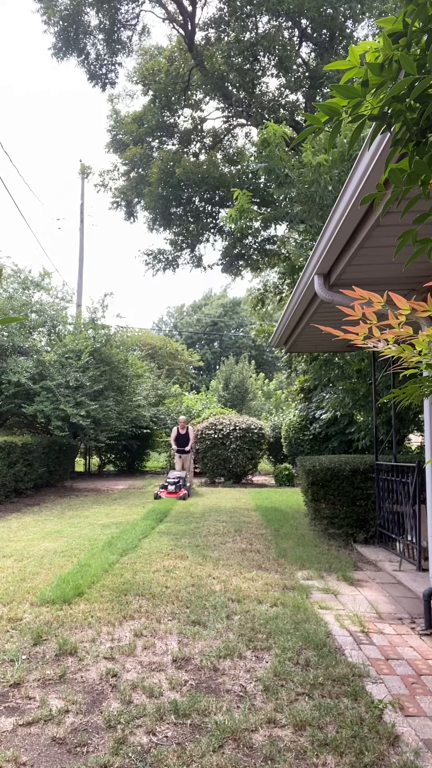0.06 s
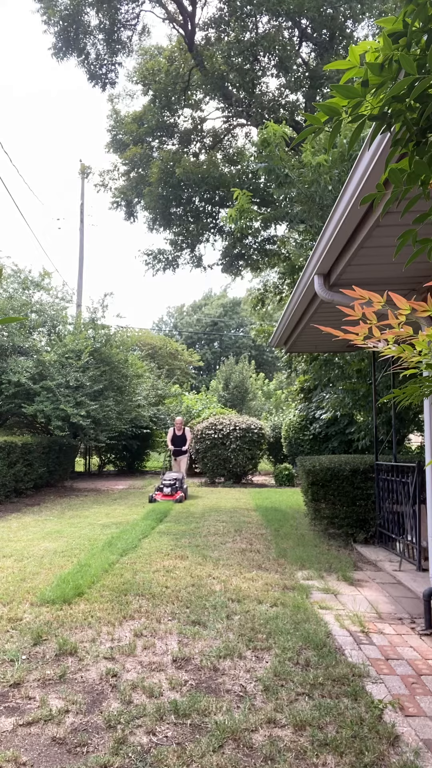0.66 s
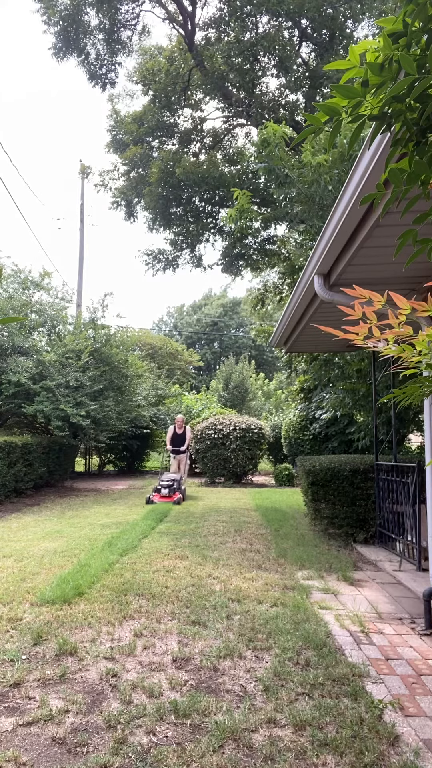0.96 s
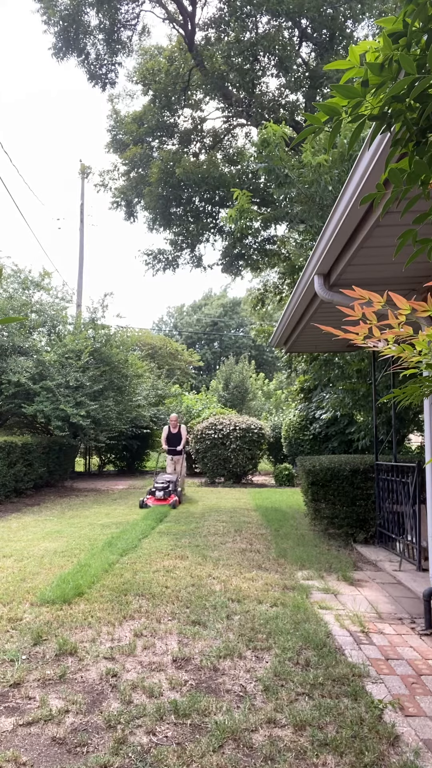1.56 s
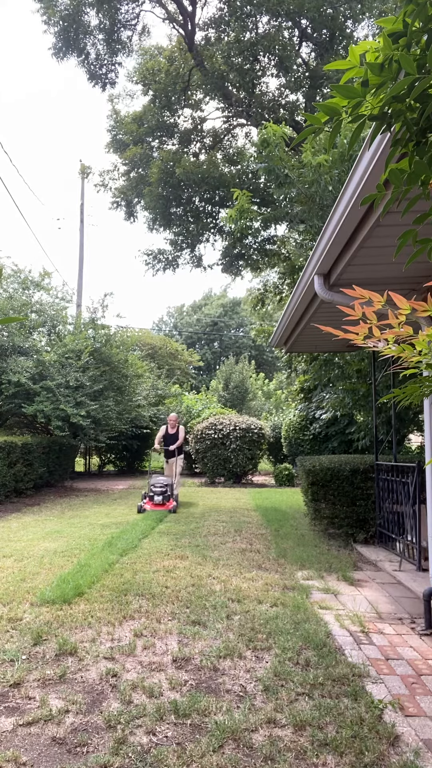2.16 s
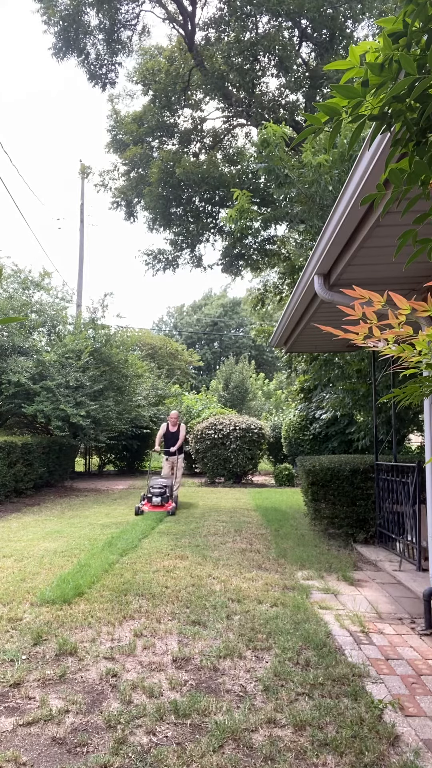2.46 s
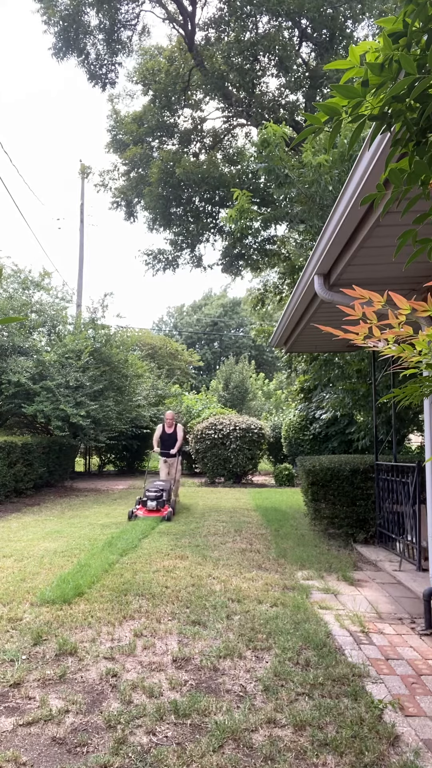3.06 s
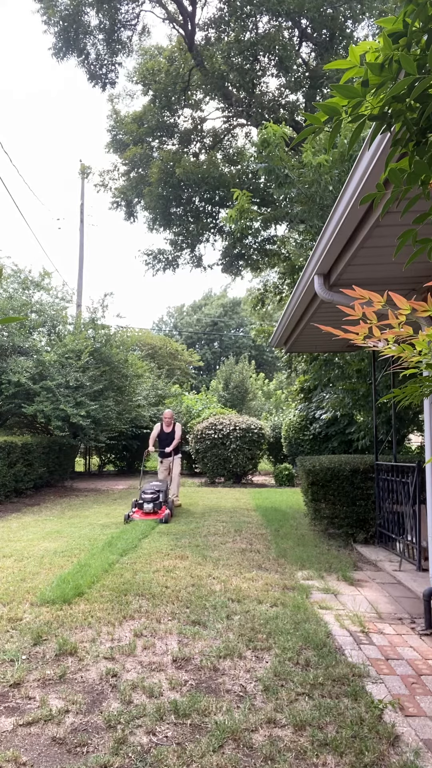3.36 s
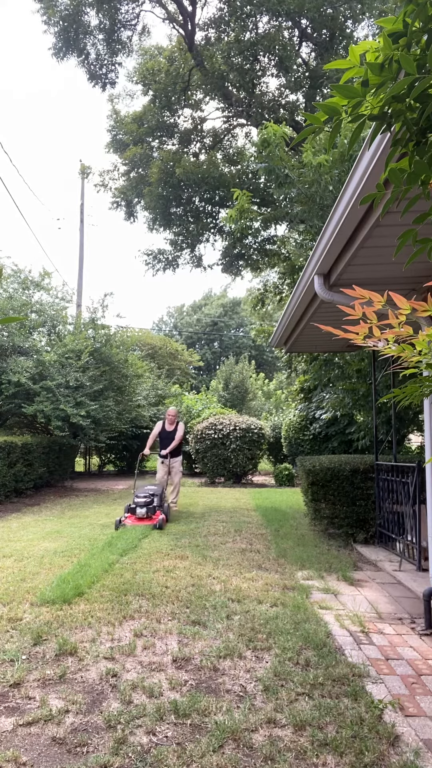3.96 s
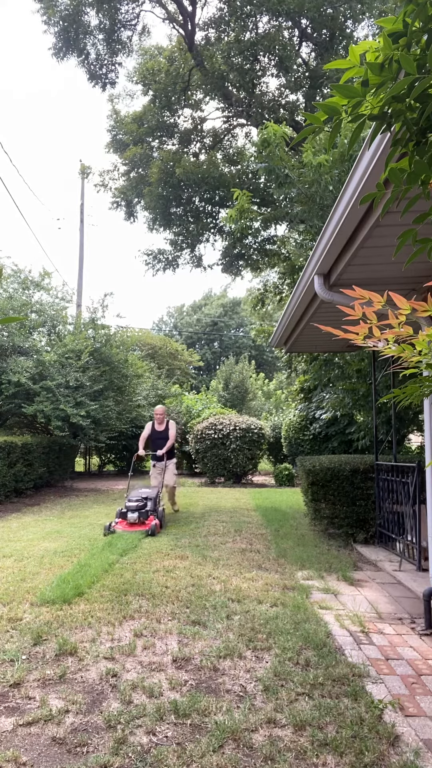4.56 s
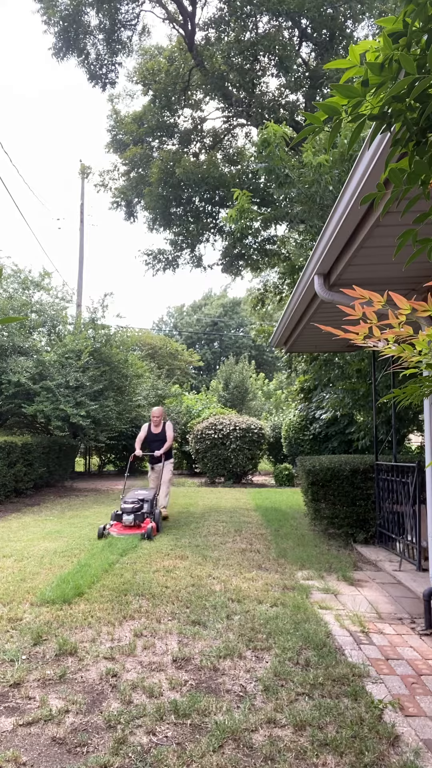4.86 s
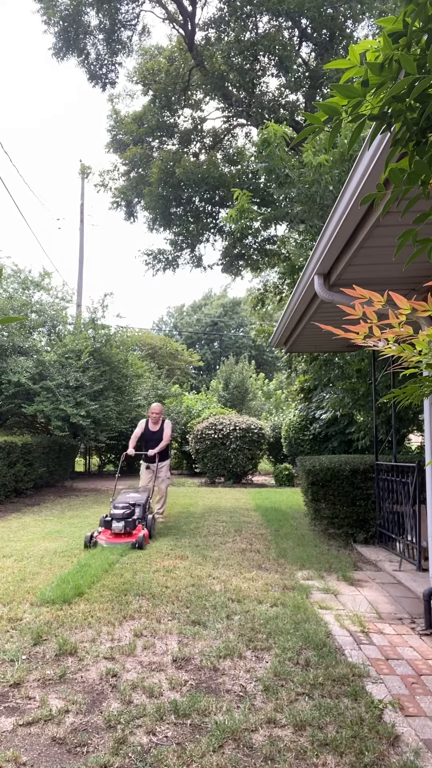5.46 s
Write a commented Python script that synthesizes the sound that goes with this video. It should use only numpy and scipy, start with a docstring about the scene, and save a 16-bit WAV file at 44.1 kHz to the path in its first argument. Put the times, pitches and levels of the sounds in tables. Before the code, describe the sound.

Outdoors on a lawn, a phone picks up the continuous drone of a small petrol mower some way off. As it comes slowly closer, the blade hum and low rumble swell, and the metallic rattle and grainy hiss of cutting become clearer. The engine slows a little now and then in thicker grass. Towards the end the steel housing rings briefly and a twig cracks sharply under the blade.

```python
"""The steady drone of a petrol mower grows as it is pushed slowly across a garden towards a phone.
Its one-cylinder, four-stroke engine fires once per cycle (two turns) and slows in thick grass.
The two-ended blade hums, the valves clatter through the ringing steel deck (the blade's housing)
and cut grass hisses. Near the end the blade cracks a twig."""
import sys
import numpy as np
from scipy import signal
from scipy.fft import rfft, irfft
from scipy.io import wavfile
from scipy.ndimage import map_coordinates

SR = 44100
rng = np.random.default_rng(int(sys.argv[2]) if len(sys.argv) > 2 else 0)


def transcribe(signal):
    """Save signal, clipped to [-1, 1], as a 16-bit WAV file at the path in sys.argv[1]."""
    frames = np.atleast_2d(signal).T
    limited = np.clip(frames, -1, 1)
    pcm = np.round(limited * 32767).astype(np.int16)
    wavfile.write(sys.argv[1], SR, pcm)


N = 247842
TIME = np.arange(N) / SR
FREQ_HZ = np.maximum(np.fft.rfftfreq(N, 1 / SR), 1)

# engine speed, which sags where the grass is thick: time_s, turns_per_minute
ENGINE_SPEED = [(0.0, 3006), (0.8, 3026), (1.07, 2953), (1.33, 2968), (1.52, 3003), (2.08, 3036),
                (2.3, 2920), (2.75, 2979), (3.0, 2943), (3.55, 2952), (3.85, 2977), (4.15, 2971),
                (4.52, 2880), (4.75, 2965), (5.08, 2979), (5.25, 2833), (5.62, 2858)]


def engine_drone(cycle, near, muffler_hz=380, intake_hz=240, intake_lead=.23, unsteady=0.019, warble=0.03):
    """Each cycle the engine gulps air, then puffs exhaust; the tone warbles as the blade bites."""
    # tones of the drone: multiple_of_firing_rate, far_db, near_db
    harmonics = [(2, -17, -11), (3, -16, -12), (5, -6, -6), (6, -0.5, -4), (7, -12, -15.5), (9, -25, -10),
                 (10, -27.5, -4), (11, -25.5, -21), (13, -20, -11), (14, -24.5, -20.5), (15, -24.5, -18.5),
                 (17, -20, -22), (18, -28, -29), (19, -21, -20), (20, -22.5, -14), (21, -26, -20),
                 (22, -23, -18), (23, -30, -22), (24, -25, -16), (25, -47, -51), (26, -37.5, -34),
                 (27, -36, -20), (28, -25.5, -19.5), (32, -27.5, -25)]
    # exhaust level, highest where the outlet points at the phone: time_s, level_db
    exhaust_level = [(0, -22), (1.3, -19.5), (3.9, -18), (4.5, -19), (5.62, -20)]
    firing_hz = (cycle[-1] - cycle[0]) * SR / N
    out = 0
    for multiple, far_db, near_db in harmonics:
        k = round(multiple)
        # the gulp is sharper than the puff, so it takes over above intake_hz
        puff_and_gulp = 1 + k * firing_hz / intake_hz * np.exp(2j * np.pi * k * intake_lead)
        # the muffler scatters the timing of the high tones
        scatter = np.pi * min((k * firing_hz / muffler_hz) ** 4, 1) * rng.uniform(-1.075, 1)
        bite = warble * k * near * load() * drift(14.5)
        angle = 2 * np.pi * k * cycle + np.angle(puff_and_gulp) + scatter + bite
        tremble = unsteady * k * (drift(5.8) * np.cos(angle) + drift(15.6) * np.sin(angle))
        out = out - gain(far_db + near * (near_db - far_db)) * (np.cos(angle) + tremble)
    return np.sqrt(2) * gain(curves(exhaust_level)[0]) * out


def blade_hum(cycle, near, lead_rad=0.4, flutter=0.05, warble=0.11, upper_lift_db=0.24):
    """Blade ends pass the grass chute four times a cycle; rough air shakes the hum, more in thick grass."""
    # the deepest tone, lifted and cancelled by the echo off the lawn: time_s, level_db
    deepest = [(0, -26.5), (.8, -24), (1.25, -21.5), (1.7, -20.5), (2.0, -24), (2.8, -21.5), (3.9, -19.3),
               (4.55, -17), (5.62, -17.5)]
    # tones at 2, 3 and 4 times that pitch, each swelling and fading on its own: time_s, level_db
    second = [(0.03, -22), (0.83, -25), (1.02, -21.5), (1.14, -32), (1.31, -20.5), (1.44, -25),
              (2.07, -22.5), (2.19, -30.5), (2.36, -23.5), (3.48, -31), (3.55, -24), (4.08, -26),
              (4.19, -30), (4.27, -21), (4.48, -26.5), (5.58, -25)]
    third = [(0.1, -55), (1.53, -42), (1.84, -28.5), (1.95, -33), (2.15, -24.5), (2.24, -32), (3.43, -23),
             (4.46, -22), (5.03, -19.5), (5.11, -28), (5.32, -19.5), (5.38, -27), (5.49, -16.5),
             (5.58, -21)]
    fourth = [(0, -37.5), (.5, -29), (.7, -35), (1.139, -30.5), (1.33, -33), (1.72, -34.5), (1.92, -24),
              (2.04, -28), (2.13, -25.5), (2.3, -37), (2.5, -37), (2.85, -29.5), (3.6, -34), (3.8, -46),
              (4.15, -32), (4.6, -32), (5.0, -29.5), (5.62, -29)]
    sizes = [gain(curves(deepest)[0])]
    sizes += [gain(curves(table)[0] + upper_lift_db) for table in (second, third, fourth)]
    shake = flutter * (1 + near) + warble * near * load()
    out = 0
    for k, size in enumerate(sizes, 1):
        angle = 2 * np.pi * 4 * k * cycle
        out = out - size * np.cos(angle - lead_rad * k + shake * k * drift(23))
    return np.sqrt(2) * out


def deck_noise(cycle, near):
    """All the noise from the steel deck along one path; its rings colour the rumble and clatter."""
    # notes at which the deck and engine cover ring: pitch_hz, width_hz, relative_db
    rings = [(569, 30, -5), (887, 21.5, -6.5), (1000, 23, -6.5), (1520, 20.4, -6.5), (1745, 24, -6),
             (1940, 36, 0.5), (2126, 61, 0), (2536, 90, 2.5), (2930, 48, -0.5), (3086, 43, 0.5),
             (3766, 240, -3)]
    ring_power = sum(np.abs(1.73 * gain(db) * resonance(hz, width)) ** 2 for hz, width, db in rings)
    body = np.sqrt(1 + ring_power)
    rumble = air_rumble(cycle, near, body)
    clatter = valve_clatter(cycle, near, body)
    return rumble + clatter + grass_hiss(cycle, near) + valve_ticks(cycle)


def air_rumble(cycle, near, body):
    """Air churned under the deck rumbles and surges once a cycle."""
    # tone colour of the rumble: pitch_hz, far_db, near_db
    colour = [(25.4, -14, -21), (59.6, -4, -17), (104, -2, -14), (189.6, -6, -15), (277, -8, -10),
              (392, -4, -2), (544, -7, -3.5), (785, -15.5, -7), (985, -13, -12), (1210, -36, -14.5),
              (2000, -56, -43)]
    churn = cyclic_noise(cycle, repeat=0.07) * (0.45 + 0.61 * burst(cycle, -0.29, 0.21, scatter_db=1.5))
    level = loudness(near, far_db=-31.5, near_db=-28, load_db=0.64)
    return level * far_to_near(churn, colour, near, body)


def valve_clatter(cycle, near, body, repeat=0.45, slop_cycles=0.0055):
    """The valves rattle steadily; intake, burning and exhaust add bursts, each a bit early or late."""
    # noisy bursts, timed from the exhaust puff: place_cycles, width_cycles, strength, pitch_hz, width_hz
    strokes = [(-.29, 0.07, 0.66, 3700, 3600), (-.075, .02, 1.08, 1660, 800),
               (-.01, 0.018, 0.87, 1960, 2200), (.065, 0.019, 0.65, 1690, 1300),
               (.14, 0.099, 0.63, 1400, 995), (-.08, .07, .55, 3500, 3200)]
    # tone colour of the valves and exhaust gas: pitch_hz, far_db, near_db
    colour = [(500, -18, -12), (895, -2, -3), (1050, -1, -3), (1480, -3, -2), (2270, -4, -6),
              (2844, -3.5, -1), (3300, -4, -4), (4560, -3, -4), (4370, 2.5, 13), (5140, -6, -20.5),
              (5940, -9.5, 7), (7670, -11.5, -7.5), (10800, -22, -15)]
    rattle = filtered(cyclic_noise(cycle, repeat), resonance(2170, 4400))
    for place, width, strength, hz, width_hz in strokes:
        gas = filtered(cyclic_noise(cycle, repeat), resonance(hz, width_hz) ** 2)
        stroke = burst(cycle, place + slop_cycles * drift(20), width, scatter_db=1.86)
        rattle = rattle + strength * stroke * gas
    level = loudness(near, far_db=-31.5, near_db=-26, load_db=-0.97)
    return level * moving_air(far_to_near(echoes(rattle), colour, near, body))


def grass_hiss(cycle, near):
    """Stalks are cut in clumps, so the hiss is grainy; it swells in thick patches."""
    # tone colour of cut grass and air at the blade tips: pitch_hz, relative_db
    colour = [(2000, -5), (5000, 0), (7000, -1), (9000, -1), (10300, 0), (12000, -2), (14300, -4.5),
              (15500, -7)]
    # patches of thick grass: middle_s, half_length_s, boost_db
    patches = [(2.1, 0.35, 1), (5.25, 0.18, 1.6)]
    cutting = noise() * (1 + 0.39 * burst(cycle, -0.096, 0.31, scatter_db=3.5))
    clumps = gain(0.8 * drift(600) + 0.5 * drift(7.4))
    thick = gain(sum(db * swell(middle_s, span_s) for middle_s, span_s, db in patches))
    level = loudness(near, far_db=-41, near_db=-34.5, load_db=0.65)
    return thick * level * filtered(cutting * clumps, gain(spectra(colour)[0]))


def valve_ticks(cycle, decay_cycles=.12, scatter_db=2.5):
    """Valves and their levers snap shut once a cycle and briefly ring the engine cover."""
    # ticks, each clearest on one stretch of the walk:
    # place_cycles, pitch_hz, width_hz, level_db, middle_s, half_length_s
    ticks = [(-.36, 3790, 200, -44, 2.05, 2.3), (-.35, 2490, 120, -42, 0.67, 0.96),
             (-.14, 3760, 300, -49, 1.5, 1.8), (-.25, 3690, 430, -37, 5.08, 0.26),
             (0.066, 2870, 460, -35, 5.35, 0.28)]
    out = 0
    for place, hz, width_hz, db, middle_s, span_s in ticks:
        snap = np.exp(-((cycle - place) % 1) / decay_cycles) * gain(scatter_db * drift(19))
        ring = filtered(noise(), resonance(hz, width_hz) ** 2)
        out = out + gain(db) * swell(middle_s, span_s) * unit_rms(snap * ring)
    return out


def ringing_metal(cycle, jolt=0.61):
    """Every firing jolts the thin metal of the cover and deck, which rings and whines."""
    # a thin whine above the blade's hum: time_s, level_db
    whine = [(0, -45), (.35, -58), (.5, -46), (.8, -50), (1.05, -43), (1.3, -47.5), (1.52, -43), (1.7, -44),
             (1.92, -36.5), (2.1, -41), (2.3, -39), (2.55, -47), (3.3, -44.5), (3.6, -57), (4.15, -46),
             (4.6, -53), (5.62, -49)]
    # two close rings of the deck, swelling as the blade works: time_s, lower_db, upper_db
    ring_pair = [(0, -55, -46), (1.4, -46, -43.5), (2.2, -41, -40), (2.45, -44, -39.5), (2.8, -40, -38),
                 (3.15, -38, -41), (3.5, -55, -48), (3.9, -45, -39), (4.25, -38, -34.5), (4.55, -39, -45),
                 (4.85, -47, -50), (5.62, -48, -48)]
    # thin panels, each with its own stretch of the walk: pitch_hz, width_hz, wander_hz, base_db,
    # rise_db, middle_s, half_length_s, chatter_db, left_minus_right_db, left_lead_rad
    panels = [(572, 22, 2.93, -49.5, 23, 5.33, 0.15, 5, 4, .4),
              (1448, 90, 9.5, -55, 14, 1.5, 0.67, 5, 13, 2.8),
              (1800, 64, 20, -54, 13, 4.8, 0.98, 4, 10, .5),
              (1929, 38, 9.26, -54, 11.5, 1.53, 0.36, -1, 2, 0.33),
              (2420, 94, 44, -59.5, 30, 5.3, 0.23, 4, 1.5, 2.46),
              (3764, 30, 16, -47, -0.5, 1.8, 1, 3.5, 2, 1.1)]
    shaking = 3.5 + jolt * burst(cycle, -0.12, .17, scatter_db=3)
    whine_db = curves(whine)[0]
    lower_db, upper_db = curves(ring_pair)
    out = gain(whine_db) * panel(shaking, 1277.5, 14, wander_hz=4.76, chatter_db=1.5, lead_rad=0.95)
    out += gain(lower_db) * panel(shaking, 2278, 130, wander_hz=28, chatter_db=1.5, lead_rad=1.0)
    out += gain(upper_db) * panel(shaking, 2458, 80, wander_hz=26, chatter_db=2, lead_rad=1.42, pan_db=-2)
    for hz, width_hz, wander_hz, base_db, rise_db, middle_s, span_s, chatter_db, pan_db, lead in panels:
        level = gain(base_db + rise_db * swell(middle_s, span_s))
        out += level * panel(shaking, hz, width_hz, wander_hz, chatter_db, lead, pan_db)
    return out


def panel(shaking, hz, width_hz, wander_hz, chatter_db, lead_rad, pan_db=0):
    """One thin panel, in stereo; it chatters on its fixings and wanders in pitch."""
    ring = signal.hilbert(filtered(noise(), resonance(hz, width_hz) ** 2))
    ring = ring / (np.abs(ring) + .5) ** 0.54  # partly evens out the loudness
    ring = ring * shaking * gain(chatter_db * drift(55))
    ring = ring * np.exp(2j * np.pi * np.cumsum(wander_hz * drift(8)) / SR)
    left = gain(pan_db / 2) * ring.real
    right = gain(-pan_db / 2) * (ring * np.exp(-1j * lead_rad)).real
    return unit_rms(np.array([left, right]))


def deck_buzz(cycle, flutter=0.01, fade_db=2.5, apart_rad=0.7):
    """The deck sends out a fine rasp of high engine tones, which waver and fade in the moving air."""
    # tones, each clearest on one stretch of the walk:
    # multiple_of_firing_rate (rounded below), level_db, middle_s, half_length_s
    overtones = [(23, -41, 3.6, 0.89), (25, -48, 2.9, 1.1), (28, -43.5, 2, .6), (29, -48.5, 3.1, 1),
                 (30, -49, 4.8, 0.91), (32, -47, 1.8, 0.53), (32, -46, 4.4, .8), (35, -50, 3.9, 0.8),
                 (36, -43.5, 3.97, .5), (40, -47.5, 1.8, 0.87), (52, -49.5, 3.6, 0.95),
                 (56, -60.5, 0.79, 0.69), (57, -58, 1.43, 0.66), (58, -47, 1.38, 0.38),
                 (58, -46, 4.18, 0.39), (60, -49, 5.2, 1.8), (69.8, -48, 0.55, 1.4), (70.5, -53.5, 6, 0.5),
                 (71.9, -49, 4.2, 1.3), (77.1, -44.5, 4, .8), (78.4, -48, 1.6, 0.63),
                 (78.8, -46.5, 4.5, 0.52), (89.5, -55, 2.8, 0.96), (93.2, -53, 3.2, 1.3),
                 (98.4, -48.5, 3.3, 0.7), (120.2, -52.5, 2.6, 1.5)]
    out = 0
    for multiple, db, middle_s, span_s in overtones:
        k = round(multiple)
        angle = 2 * np.pi * (k * cycle + rng.random()) + flutter * k * drift(10)
        size = gain(db + fade_db * drift(6)) * swell(middle_s, span_s)
        side_shift = np.array([[1], [-1]]) * apart_rad * drift(1.1)
        out = out + size * np.cos(angle + side_shift)
    return np.sqrt(2) * out


def twig_snap(apart=0.87):
    """A twig snaps and its pieces hit the deck: quick, bright cracks, partly unlike left and right."""
    # cracks of the twig: start_s, level_db, decay_s
    cracks = [(5.49, -19, 0.0028), (5.494, -19, 0.0076), (5.509, -27, 0.005)]
    level = sum(gain(db) * (TIME >= s) * np.exp(-np.abs(TIME - s) / decay_s) for s, db, decay_s in cracks)
    colour = np.abs(resonance(4600, 7500)) + 1.8 * np.abs(resonance(2950, 1100)) + .06
    middle, side = filtered(noise(), colour), filtered(noise(), colour)
    return level * unit_rms(middle + np.array([[apart], [-apart]]) * side)


def echoes(sound):
    """Two echoes thin out some pitches; these slide down as the mower nears and the delays grow."""
    # echoes off the lawn (soft ground flips the wave) and porch: delay_ms, growth_ms_per_s, strength
    paths = [(1.495, 0.173, -0.14), (0.753, 0.225, 0.11)]
    out = sound
    for delay_ms, growth, strength in paths:
        late_samples = (delay_ms + growth * TIME) * SR / 1000
        out = out + strength * map_coordinates(sound, [np.arange(N) - late_samples], order=3)
    return out


def moving_air(sound, bend_s=.00008, depth_db=2, fade_rate_hz=21, bands=10):
    """Moving air bends the pitch a little and makes each third of an octave come and go on its own."""
    bent = map_coordinates(sound, [np.arange(N) + bend_s * SR * drift(9)], order=3, mode="mirror")
    spectrum = rfft(bent)
    band = np.clip(3 * np.log2(FREQ_HZ / 800), 0, bands - 1)
    out = 0
    for k in range(bands):
        share = np.maximum(1 - np.abs(band - k), 0)
        out = out + irfft(spectrum * share, N) * gain(depth_db * drift(fade_rate_hz))
    return out


def microphones(direct, scattered, mono_hz=440, bass_unlike_db=-30):
    """Both sides share the bass; higher up one leads, and echoes off house and hedges make them unlike."""
    # the phone's two microphones: pitch_hz, left_lead_rad, likeness (0-1), left_minus_right_db
    stereo = [(453, -0.06, 0.86, 2), (650, -1, 1, 3), (967, -1.76, 0.76, -6), (1303, -4, 0.63, -1),
              (1860, -6.5, 0.25, 2.5), (2620, -9, 0.61, -1), (3240, -10.4, 0.56, 2.5),
              (3780, -7, 0.12, 0.5), (4400, -8.5, 0.8, -1.5), (4883, -9.5, 1, -0.3), (6140, -9.5, 1, 1),
              (7610, -11, 0.68, -0.5), (10900, -13.5, 0.95, 0), (13000, -13.8, 0.75, 0.5),
              (14600, -15.7, 1, 0)]
    lead_rad, likeness, balance_db = spectra(stereo)
    wide = 1 / (1 + (mono_hz / FREQ_HZ) ** 8)
    unlike = wide * np.clip(1 - likeness, 0, 1) / 2 + gain(bass_unlike_db) ** 2
    shared = rfft(direct) * np.sqrt(1 - unlike)
    apart = rfft(scattered) * np.sqrt(unlike)
    left = (shared + apart) * gain(wide * balance_db / 2)
    right = (shared - apart) * gain(-wide * balance_db / 2) * np.exp(-1j * wide * lead_rad)
    return irfft(np.array([left, right]), N)


def load(free_rpm=3093, full_sag_rpm=189):
    """How hard the grass holds the blade back, from 0 to 1."""
    return np.clip((free_rpm - curves(ENGINE_SPEED)[0]) / full_sag_rpm, 0, 1)


def loudness(near, far_db, near_db, load_db):
    """Gain of a layer as the mower nears; full load adds load_db."""
    return gain(far_db + near * (near_db - far_db) + load_db * load())


def far_to_near(sound, colour, near, body):
    """Blend a sound from its far tone colour to its near one."""
    far_db, near_db = spectra(colour)
    return (1 - near) * filtered(sound, gain(far_db) * body) + near * filtered(sound, gain(near_db) * body)


def burst(cycle, place, width, scatter_db):
    """One short swell in each engine cycle, no two equally strong."""
    offset = (cycle - place + .5) % 1 - .5
    return np.exp(-.5 * (offset / width) ** 2) * gain(scatter_db * drift(35))


def cyclic_noise(cycle, repeat):
    """Noise of which a share (repeat) comes back alike in every engine cycle."""
    size = int(N / (cycle[-1] - cycle[0]))
    pattern = rng.standard_normal(size)[(cycle % 1 * size).astype(int) % size]
    return np.sqrt(repeat) * pattern + np.sqrt(1 - repeat) * noise()


def drift(rate_hz, size=16384):
    """A smooth random curve with a spread of one, changing about rate_hz times a second."""
    hz = np.fft.rfftfreq(size, N / SR / size)
    slow = irfft(rfft(rng.standard_normal(size)) * np.exp(-(hz / rate_hz) ** 2))
    return np.interp(TIME, np.linspace(0, N / SR, size), unit_rms(slow))


def swell(middle_s, span_s):
    """A smooth rise from zero to one and back."""
    return np.exp(-.5 * ((TIME - middle_s) / span_s) ** 2)


def resonance(hz, width_hz):
    """How strongly something that rings at hz answers each frequency; one at its peak."""
    return 1 / (1 + 1j * (FREQ_HZ ** 2 - hz ** 2) / (FREQ_HZ * width_hz))


def filtered(sound, response):
    """Filter by a gain per frequency, then scale to a level of one."""
    return unit_rms(irfft(rfft(sound) * response, N))


def curves(table):
    """Turn rows that start with a time into columns with a value for every sample."""
    time_s, *columns = np.transpose(table)
    return [np.interp(TIME, time_s, column) for column in columns]


def spectra(table):
    """Turn rows that start with a pitch into columns with a value for every frequency."""
    hz, *columns = np.transpose(table)
    return [np.interp(np.log(FREQ_HZ), np.log(hz), column) for column in columns]


def noise():
    """White noise."""
    return rng.standard_normal(N)


def gain(db):
    """Turn decibels into a multiplier."""
    return 10 ** (np.asarray(db) / 20)


def unit_rms(sound):
    """Scale to an average (rms) level of one."""
    return sound / np.sqrt(np.mean(sound ** 2))


def scene():
    """The turning engine sets the beat of every layer but the twig."""
    # how far the mower has come: time_s, nearness (0-1)
    approach = [(0, 0), (1.5, 0), (2.4, 0.17), (3.3, 0.44), (4.4, 0.8), (5.62, 0.98)]
    near = curves(approach)[0]
    # engine cycles so far, two turns each; the exhaust puffs at whole numbers
    cycle = np.cumsum(curves(ENGINE_SPEED)[0]) / (120 * SR) - .373
    direct = engine_drone(cycle, near) + blade_hum(cycle, near) + deck_noise(cycle, near)
    scattered = deck_noise(cycle, near)
    return microphones(direct, scattered) + ringing_metal(cycle) + deck_buzz(cycle) + twig_snap()


def record(dry):
    """The phone cuts off the highest treble."""
    top_hz = 15400
    return signal.sosfilt(signal.ellip(10, .1, 80, top_hz, fs=SR, output="sos"), dry)


dry = scene()
out = record(dry)
transcribe(out)
```